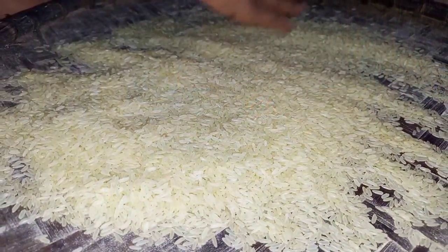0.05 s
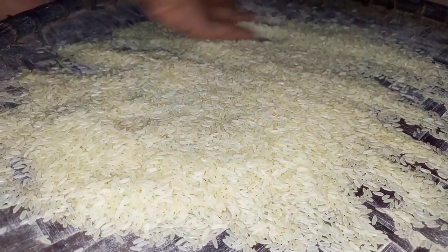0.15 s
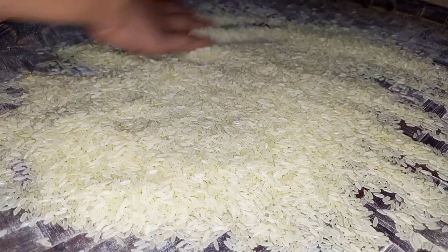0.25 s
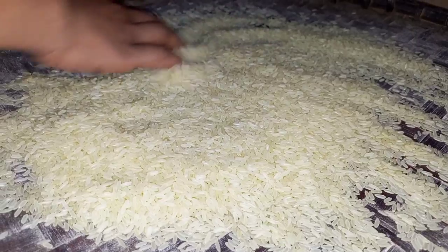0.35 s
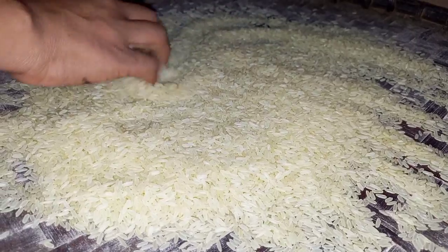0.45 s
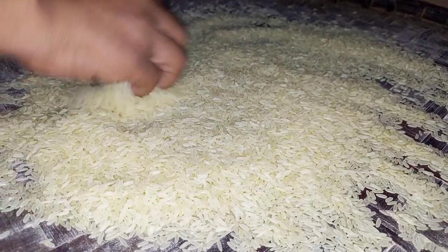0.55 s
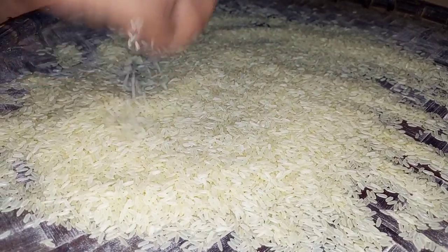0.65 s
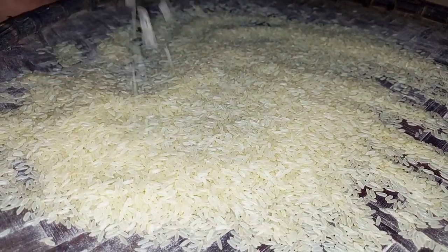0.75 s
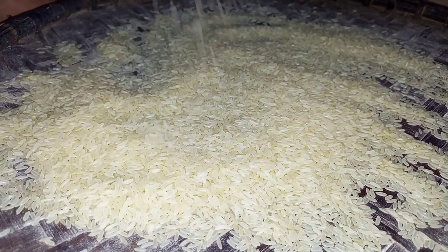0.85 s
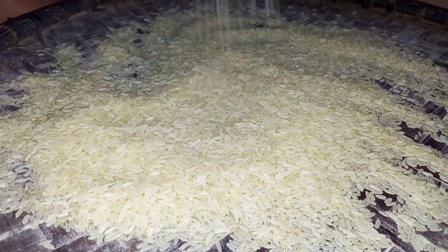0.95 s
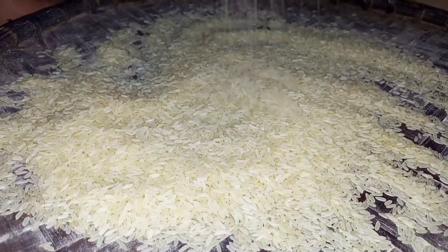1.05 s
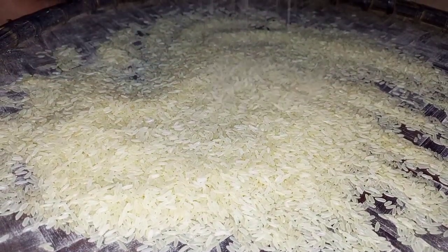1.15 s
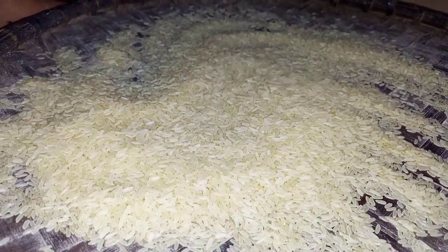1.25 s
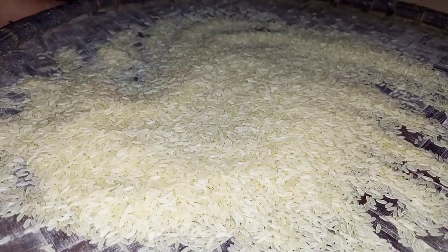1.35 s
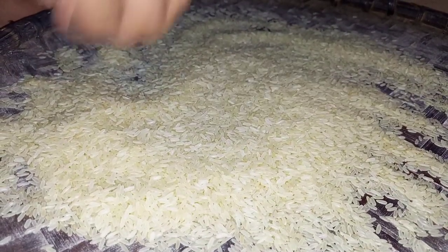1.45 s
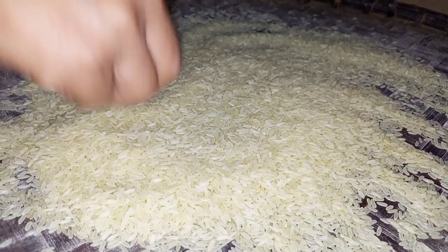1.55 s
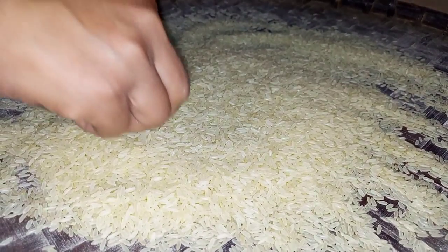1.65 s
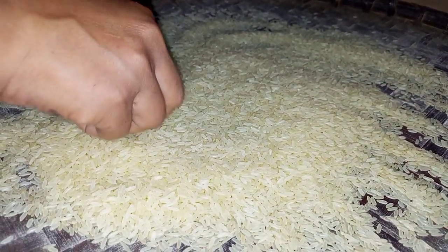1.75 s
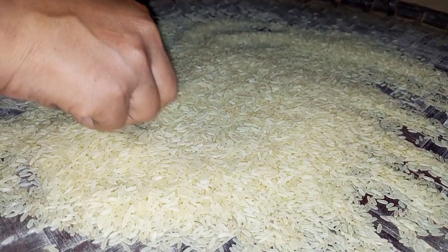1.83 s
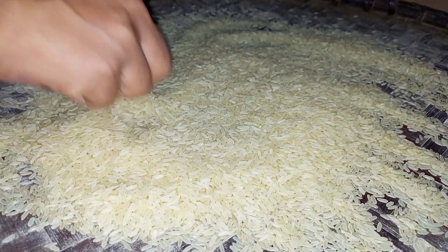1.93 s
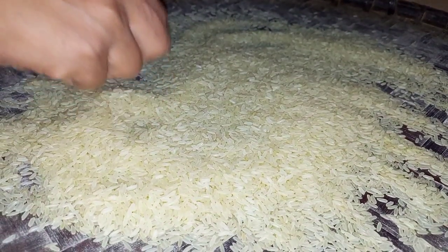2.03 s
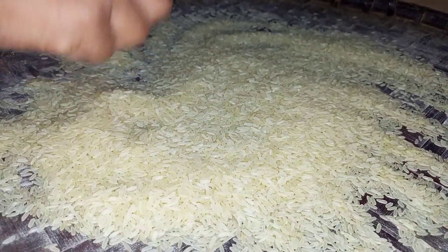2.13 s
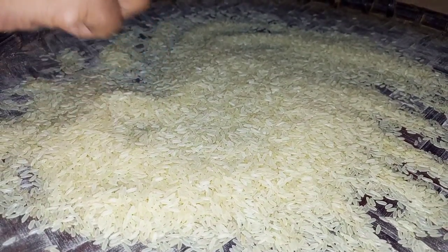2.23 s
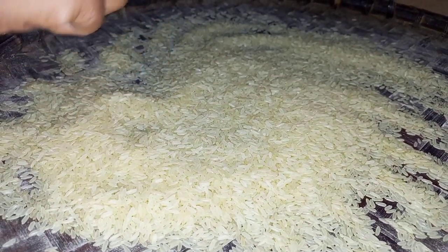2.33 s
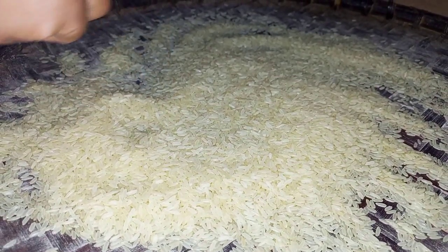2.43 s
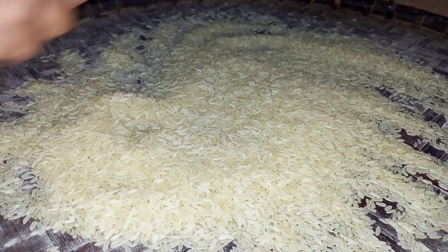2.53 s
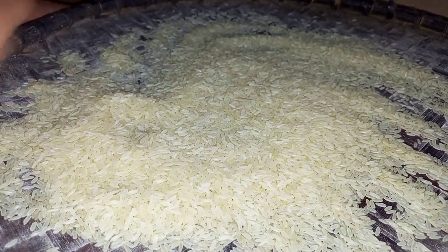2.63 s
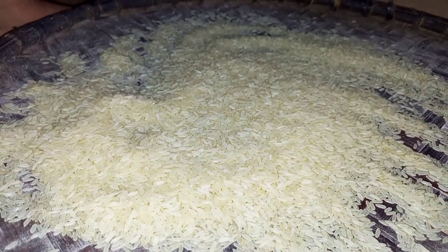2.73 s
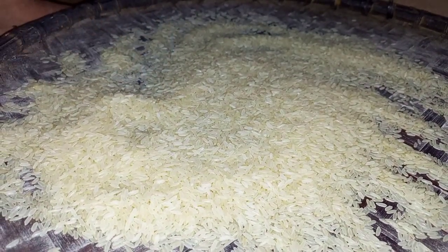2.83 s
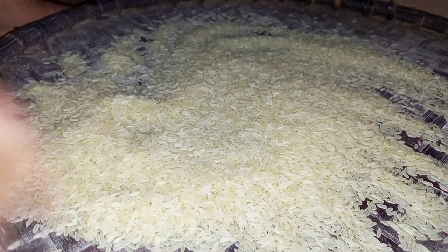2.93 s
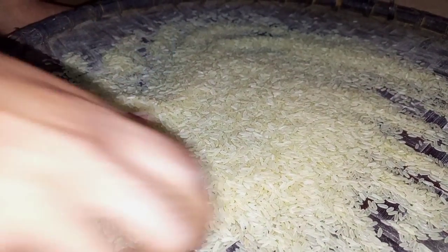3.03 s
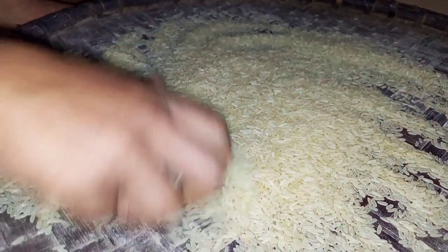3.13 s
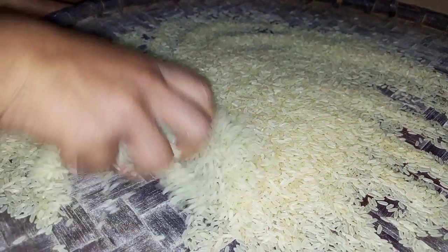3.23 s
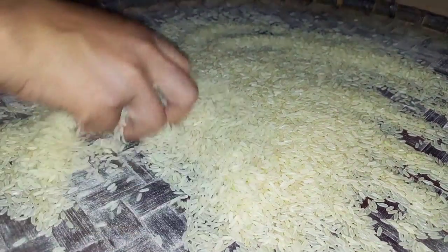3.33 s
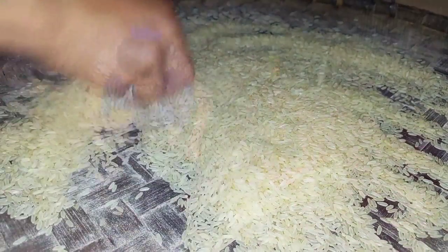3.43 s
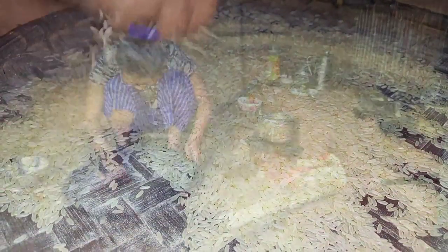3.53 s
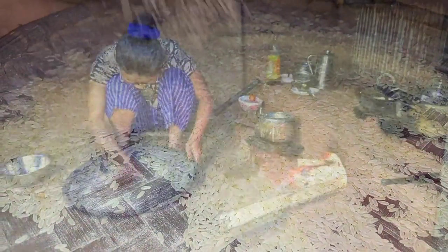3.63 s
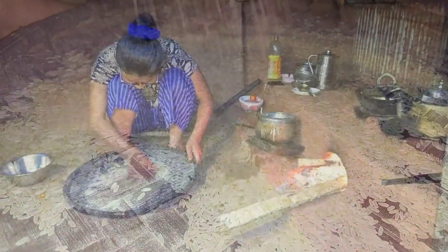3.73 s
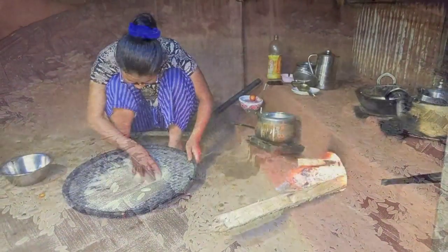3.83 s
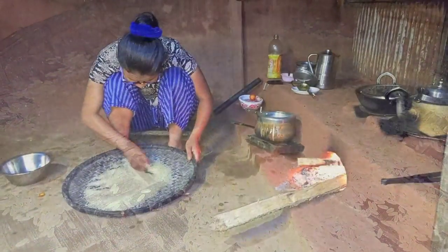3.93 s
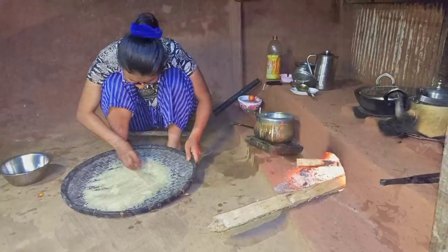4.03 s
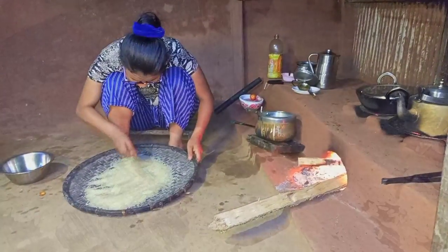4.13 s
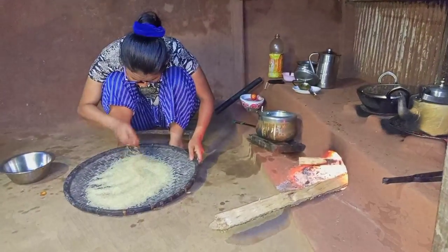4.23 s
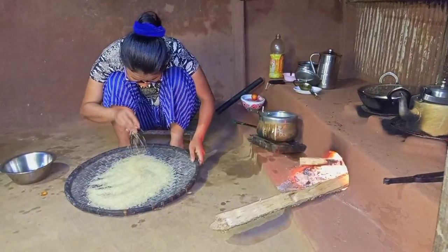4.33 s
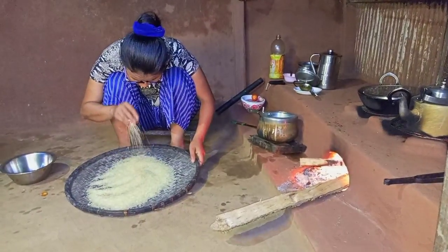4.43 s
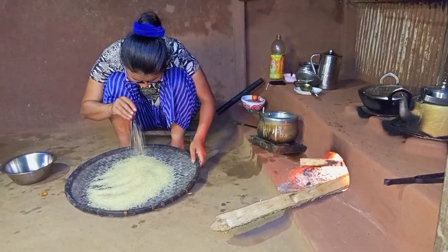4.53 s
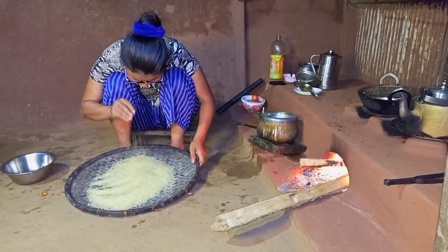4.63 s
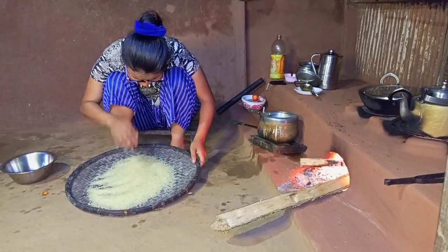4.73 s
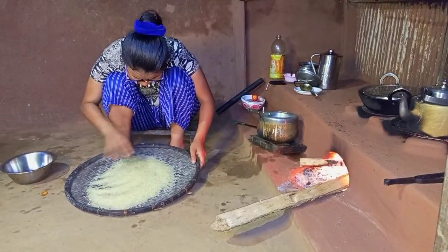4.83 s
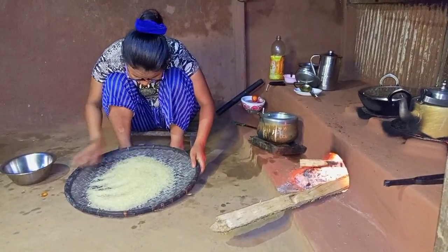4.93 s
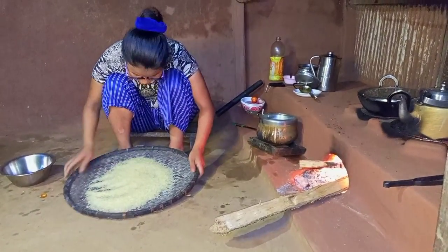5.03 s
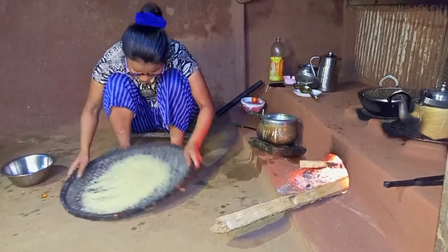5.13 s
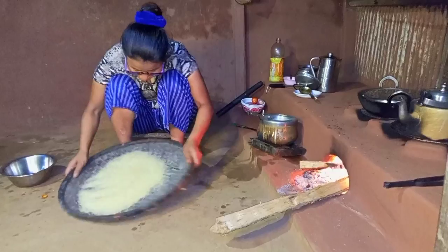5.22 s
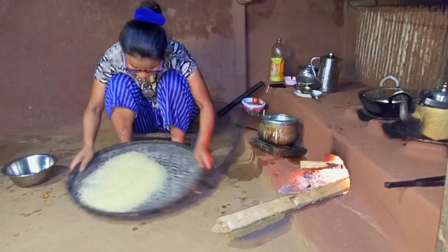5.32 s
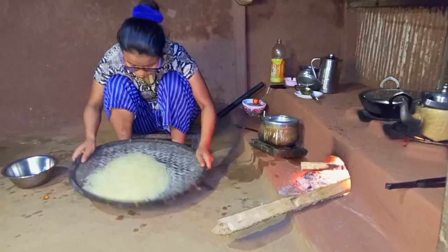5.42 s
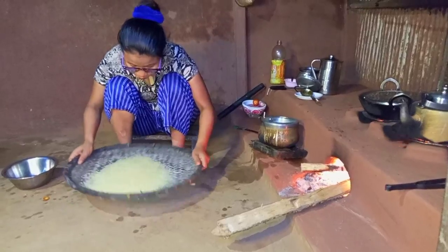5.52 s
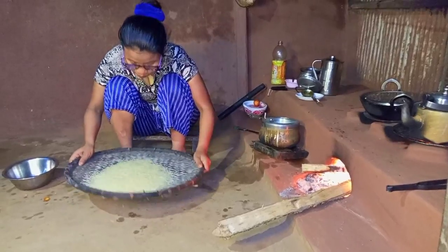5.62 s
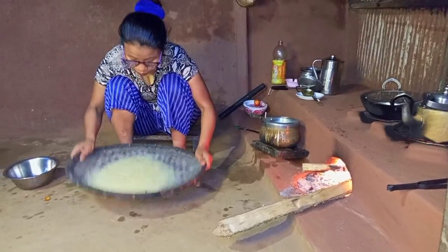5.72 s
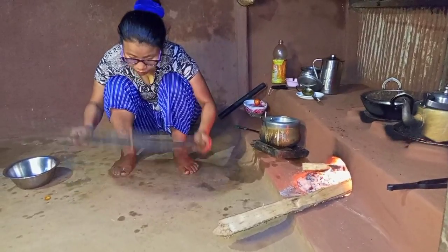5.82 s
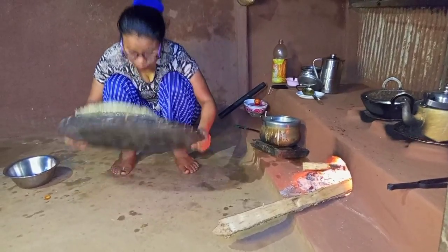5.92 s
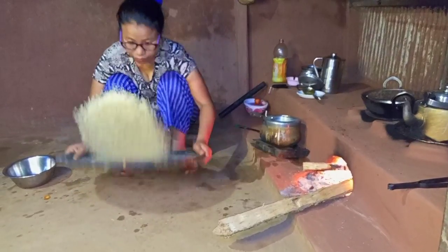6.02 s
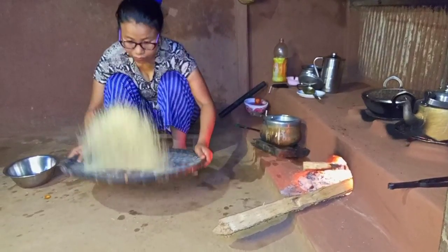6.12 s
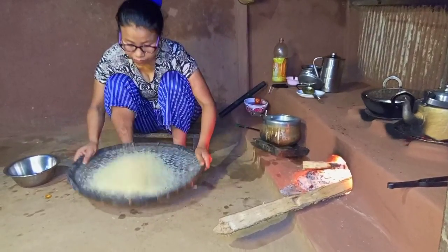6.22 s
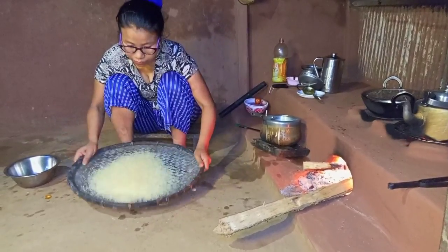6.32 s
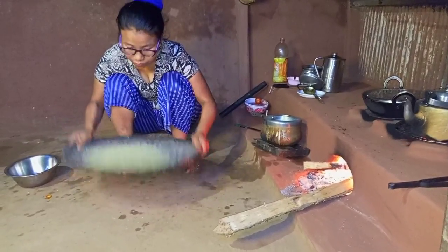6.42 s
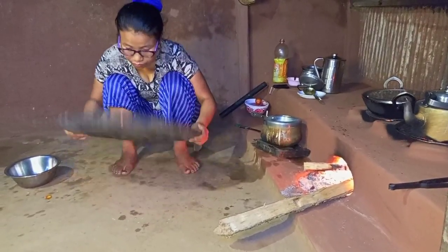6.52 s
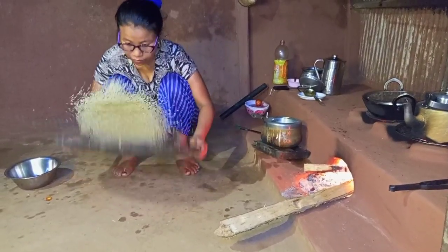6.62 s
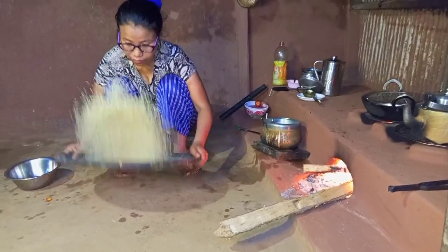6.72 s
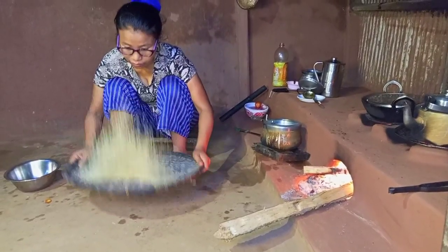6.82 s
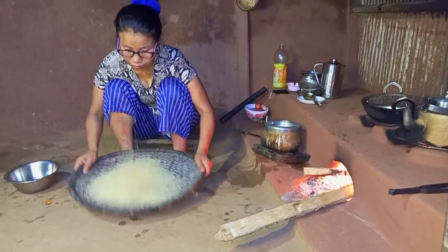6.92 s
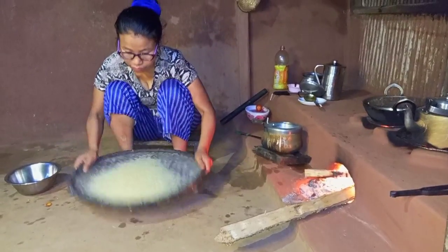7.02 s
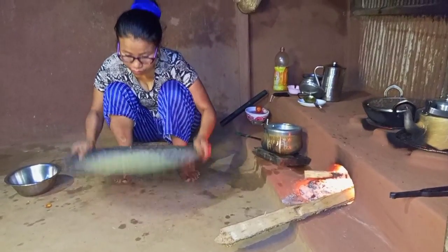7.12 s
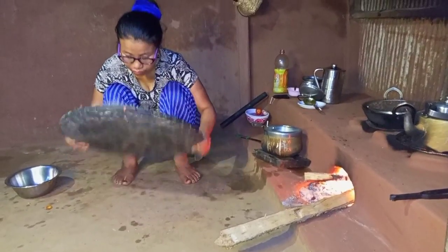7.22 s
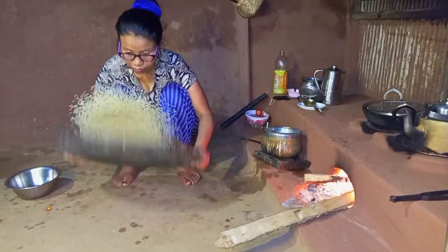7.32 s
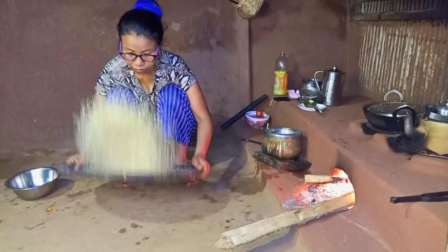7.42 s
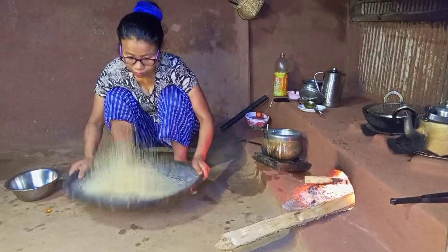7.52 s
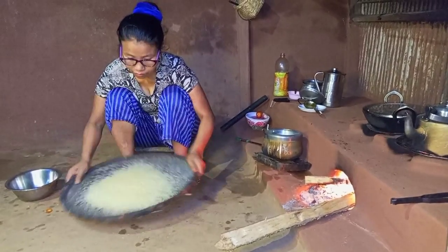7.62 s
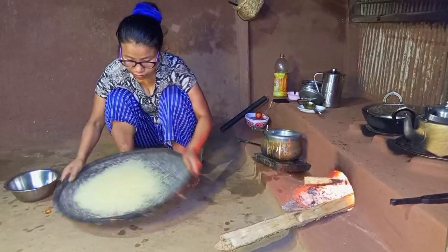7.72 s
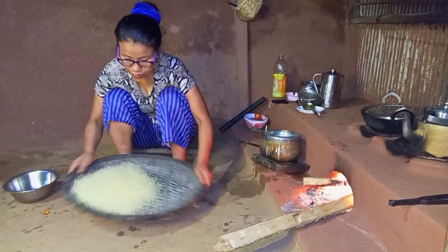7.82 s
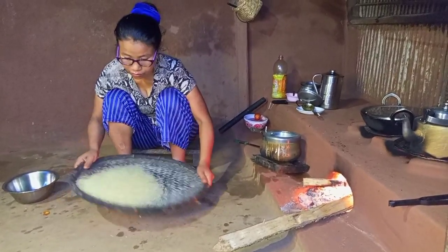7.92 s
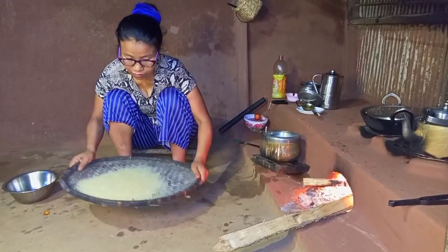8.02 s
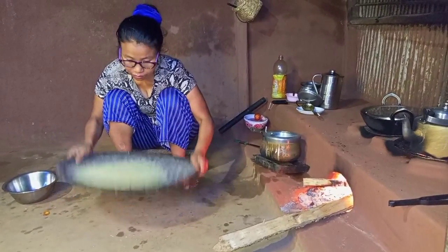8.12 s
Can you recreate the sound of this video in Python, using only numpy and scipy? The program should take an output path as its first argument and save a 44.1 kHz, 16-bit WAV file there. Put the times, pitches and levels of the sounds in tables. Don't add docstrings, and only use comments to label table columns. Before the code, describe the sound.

A quiet, dry kitchen with a soft low murmur of fire and air throughout. Close up, a hand scoops raw rice on a woven bamboo tray at about 0.2-0.8 s, a grainy bright rustle; grains drop back as scattered ticks and patter at 1.0-1.45 s. A very light brush comes near 1.9 s, then near quiet with one lone grain ticking at 2.55 s. A stronger, crunchy scoop runs 3.2-3.6 s, and the perspective fades to farther away by 3.9 s. Stirring rustles until 4.3 s, a small handful pours at 4.55-4.85 s. The tray rocks at 5.2 s and the heap slides until 5.7 s. Three tosses follow, landing near 6.05, 6.7 and 7.4 s, each a dense, sharp-edged swish of about a third of a second that settles quickly, with faint glass bangle clinks at the throws. A last rocking slide begins at 7.8 s and runs to the end.

```python
import sys
import numpy as np
from scipy import signal
from scipy.fft import rfft, irfft
from scipy.io import wavfile
from scipy.ndimage import uniform_filter1d

SR = 44100
rng = np.random.default_rng(int(sys.argv[2]) if len(sys.argv) > 2 else 0)


def to_wav(sig):
    pcm = np.clip(np.atleast_2d(sig), -1, 1) * 32767
    pcm = np.round(pcm).astype(np.int16)
    wavfile.write(sys.argv[1], SR, pcm.T)


def elevation(decibels):
    levels = np.asarray(decibels, float)
    return 10 ** (levels / 20)


N = 359856

CUT_S = 3.46, 3.86
# centre_hz, width_hz, lift_db
MIC_PEAK = [(14760, 2100, 6.5), (13900, 510, -3)]
TOSS_SPREAD_DB = 0.93


def evened(x):
    return x / np.sqrt(np.mean(x ** 2) + 1e-20)


def peaked(x, db):
    return x * elevation(db) / abs(x).max()


def add(mix, s, sound):
    part = mix[max(round(s * SR), 0):][:len(sound)]
    part += sound[:len(part)]


def smoothed(x, size):
    return uniform_filter1d(uniform_filter1d(x, int(size)), int(size))


def wander(smooth):
    return evened(smoothed(rng.standard_normal(N), smooth))


def flutter(size, smooth):
    return evened(smoothed(rng.standard_normal(size + 2000), smooth)[1000:-1000])


def read(points, hz):
    f, value = np.transpose(points)
    return np.interp(np.log(hz + 1), np.log(f + 1), value)


def humps(modes, hz):
    return sum(db / (1 + (2 * (hz - centre_hz) / width) ** 2) for centre_hz, width, db in modes)


def coloured(x, spectrum, modes=()):
    # centre_hz, width_hz, lift_db
    tray_modes = [(584, 77, 7.5), (690, 6.4, 7.5), (773.4, 6, 13.5), (870, 39, 4.5), (1050, 5.5, 9.5),
                  (1250, 9, 7), (2410, 40, 0)]
    hz = abs(np.fft.fftfreq(8192, 1 / SR))
    level_db = read(spectrum, hz) + humps([*tray_modes, *MIC_PEAK, *modes], hz)
    log_gain = np.log(elevation(np.maximum(level_db, -100)))
    minimum_phase = np.exp(np.conj(signal.hilbert(log_gain)))
    ringing = np.fft.ifft(minimum_phase).real[:4096]
    return signal.oaconvolve(x, ringing)[:len(x)]


def far_share():
    return np.interp(np.arange(N) / SR, CUT_S, [0, 1])


def air(patchy_db=2.6, stir_db=2.5, drift_share=.003, gust_db=4):
    # pitch_hz, level_db (per Hz)
    near_air = [(24, -53), (40, -20), (178, -6), (253, -12.5), (416, -12), (533, -17.5), (1070, -19.5),
                (1180, -20.5), (1760, -18), (2440, -13), (2830, -16), (5280, -13.5), (8260, -29.5),
                (13300, -32.5), (15400, -29)]
    far_air = [(24, -64), (40, -36), (87, -3.5), (136, -8), (246, -1.5), (459, -13.5), (635, -10),
               (1150, -22), (1240, -23), (1600, -31), (2440, -4.5), (3820, -12.5), (6130, -13.5),
               (15400, -23.5)]
    # centre_hz, width_hz, lift_db
    air_modes = [(160, 23, 6.5), (415, 37, 14), (1222, 93, 14.5), (2440, 120, 11.5), (5230, 870, 9),
                 (6080, 350, 10.5), (7500, 210, 9.5), (9170, 2200, 11.5), (12700, 2100, -1)]
    level_db = -66.5
    frames, hz = N // 256 + 5, np.fft.rfftfreq(1024, 1 / SR)
    column_hz = hz[:, None]
    out = np.zeros(N)
    for colour, share in (near_air, 1 - far_share()), (far_air, far_share()):
        a, b, patches = rng.standard_normal((frames, 513, 3)).T
        patches = evened(uniform_filter1d(uniform_filter1d(patches, 5, 0), 10, 1))
        drift = 1 + drift_share * evened(smoothed(b[0], 9))
        tone_db = (read(colour, hz) + humps(MIC_PEAK, hz))[:, None] + humps(air_modes, column_hz * drift)
        z = (a + 1j * b) * elevation(tone_db + patchy_db * patches / (1 + column_hz / 9000))
        gusts = evened(uniform_filter1d(b[-1], 22))
        z *= elevation(gust_db * gusts / (1 + (column_hz / 110) ** 4))
        stirs = evened(uniform_filter1d(a[0], 7))
        z *= elevation(stir_db * stirs * (column_hz / 15000) ** 2)
        murmur = evened(signal.istft(z, nperseg=1024, noverlap=768)[1][:N])
        out += np.sqrt(share) * elevation(level_db) * murmur
    return out


def walls(x, t60=0.13):
    t = np.arange(6000) / SR
    tail = rng.standard_normal(6000) * elevation(-60 * t / t60) * (t > .003)
    return signal.oaconvolve(x, tail / np.linalg.norm(tail))[:N]


def bangles():
    # start_s, pitch_hz, level_db, t60_s
    rings = [
        (0, 9000, -71, 0.98),
        (4.88, 8700, -72, 0.75),
        (6.0, 4070, -56, 0.22),
        (6.005, 10800, -58, 0.19),
        (5.69, 8650, -66, 0.54),
        (6.5, 8650, -74, .6),
        (6.64, 8650, -62, .2),
        (6.64, 9240, -64, .1),
        (6.64, 6830, -64, 0.1),
        (7.306, 3240, -64, 0.08),
    ]
    out, t = np.zeros(N), np.arange(SR // 2) / SR
    for s, hz, db, t60 in rings:
        beat = 1 + 0.27 * np.cos(2 * np.pi * 22 * t) + 0.37 * flutter(len(t), 200)
        attack = np.minimum(t / 0.0014, 1)
        add(out, s, elevation(db - 60 * t / t60) * beat * np.sin(2 * np.pi * hz * t) * attack)
    return out


def tray_hums(rough_db=3.5, waver=.05):
    # start_s, length_s, pitch_hz, level_db
    hums = [(0.39, 0.057, 328, -74), (0.415, 0.096, 412, -54), (1.55, 0.051, 500, -68),
            (2.356, 0.09, 405, -68.5), (3.296, 0.015, 554, -40), (3.878, 0.016, 1260, -46),
            (3.906, 0.013, 920, -50), (5.829, 0.051, 1250, -71), (5.929, 0.047, 1270, -74),
            (1.417, 0.067, 423, -66), (1.67, 0.048, 164, -63), (4.237, 0.13, 618, -62.5),
            (4.44, 0.19, 200, -67), (4.727, 0.091, 195, -69), (4.871, 0.091, 240.6, -70),
            (5.066, 0.14, 155.4, -62), (5.2, 0.067, 164, -59), (5.21, 0.088, 610, -66.5),
            (5.553, 0.11, 160, -64.5), (5.71, 0.12, 160, -65.5), (6.55, 0.11, 155, -69.5)]
    out = np.zeros(N)
    for s, length, hz, db in hums:
        t = np.arange(0, length, 1 / SR)
        uneven, drift = flutter(9000, 520)[:len(t)], flutter(9000, 600)[:len(t)]
        turns = np.cumsum(hz + waver * min(hz, 400) * drift) / SR
        swell = signal.windows.tukey(len(t), .6)
        add(out, s, elevation(db - 3.0 + rough_db * uneven) * np.sin(2 * np.pi * turns) * swell)
    return out


def lone_grain():
    # pitch_hz, level_db, t60_s
    bare_modes = [(1250, -15, 0.033), (1640, -3.5, 0.034), (1810, 2.5, 0.027), (2083, -5, .03),
                  (2400, -6, .04), (2760, -10, .05), (3155, -18, .04), (5420, -8, .025), (5870, -10, 0.022),
                  (8000, -26, .02), (9500, -18, .02), (4300, -22, .012)]
    start_s, level_db, rise_s = 2.5535, -39, 0.0016
    wall_echo_s, wall_echo_db = 0.019, -20
    out, t = np.zeros(N), np.arange(3000) / SR
    ring = sum(elevation(level_db + db - 60 * t / t60) * np.sin(2 * np.pi * hz * t) for hz, db, t60 in bare_modes)
    ring = ring * np.minimum(t / rise_s, 1)
    add(out, start_s, ring)
    add(out, start_s + wall_echo_s, elevation(wall_echo_db) * ring)
    return out


def clusters(rise_s=0.0021, end_db=-14, grit_db=3, width_share=.042):
    # start_s, length_s, pitch_hz, level_db
    strips = [(1.014, 0.02, 9700, -56.5), (1.015, .02, 11600, -64), (1.103, .02, 11400, -63),
              (1.103, 0.028, 9300, -66), (1.138, .015, 10200, -54), (1.163, .05, 8600, -64),
              (1.196, 0.037, 8800, -63), (1.245, 0.044, 8800, -68), (1.3, .03, 9300, -53),
              (1.4, 0.029, 9600, -63), (3.53, 0.012, 9500, -55), (3.545, .006, 9500, -50),
              (3.558, .006, 9700, -51), (4.468, .005, 9500, -60), (4.59, .006, 9500, -56),
              (5.79, .004, 9500, -64), (5.79, .004, 4800, -64), (3.632, 0.0065, 9500, -43),
              (3.672, 0.011, 9300, -46), (3.908, .008, 9600, -44), (4.558, .012, 10500, -50.5),
              (4.645, 0.026, 8500, -63), (4.68, .04, 9900, -55), (4.743, 0.075, 10600, -52),
              (4.768, .045, 8800, -51), (4.86, .015, 10000, -61), (5.977, 0.14, 5830, -58.5),
              (5.978, 0.058, 7300, -59), (5.983, .02, 9200, -63), (5.993, 0.044, 3850, -63),
              (7.303, .01, 6600, -54), (7.304, 0.025, 3300, -57), (7.301, 0.038, 2650, -66.5),
              (7.312, 0.062, 6560, -63), (7.324, .02, 9350, -59), (7.33, .012, 7500, -55),
              (0, .025, 5100, -62), (.204, 0.013, 5700, -54), (.905, 0.086, 1800, -66),
                  (.93, .04, 2460, -73), (.96, 0.043, 5240, -66), (1.46, 0.084, 3170, -67.5),
                  (.8, 0.046, 9500, -69.5), (.98, .03, 1750, -59), (1.836, .045, 2450, -68),
                  (1.84, 0.044, 1790, -67), (1.882, 0.025, 2120, -65), (1.892, .015, 1760, -62),
                  (1.915, 0.061, 1820, -69), (1.945, .015, 2120, -66), (2.597, .012, 1740, -71),
                  (2.67, .05, 4330, -69.5), (4.2, 0.063, 5900, -68), (4.26, 0.034, 6000, -67),
                  (4.31, 0.072, 1590, -73), (4.325, 0.049, 3380, -71), (4.425, 0.084, 2490, -65),
                  (4.434, .07, 6400, -66), (4.48, .04, 2070, -62), (4.516, 0.013, 6300, -57),
                  (4.534, 0.017, 6130, -50), (4.84, 0.043, 6060, -60), (4.85, 0.047, 2280, -62),
                  (5.21, 0.068, 4070, -59), (5.212, 0.035, 6660, -65), (5.22, 0.048, 2900, -58.5),
                  (5.225, 0.044, 698, -67), (5.312, .025, 6560, -62), (5.315, 0.03, 2700, -49.5),
                  (6.638, 0.037, 6800, -60), (6.638, .018, 8700, -62), (6.638, 0.024, 9350, -59),
                  (6.64, .03, 5500, -65), (6.704, .02, 2560, -58), (6.73, 0.12, 582, -67)]
    out, t = np.zeros(N), np.arange(4000) / SR
    for s, length, hz, db in strips:
        smooth = max(SR / (hz * width_share * 3), 2)
        rattle = flutter(4000, smooth) * np.cos(2 * np.pi * hz * t)
        rattle += flutter(4000, smooth) * np.sin(2 * np.pi * hz * t)
        grit = elevation(grit_db * flutter(4000, 40))
        fade = elevation(db + end_db * (t / length) ** 3)
        add(out, s, rattle * grit * np.minimum(t / rise_s, 1) * fade)
    return out


def ticks(far_db=-10, own_db=-6, scatter_db=-10, echo_s=0.019, echo_db=-16, crack=.3):
    # start_s, level_db, main_hz, sparkle_db (spray over the modes)
    near_ticks = [(0.216, -46, 1560, 2), (0.975, -48, 1720, -6), (0.995, -46, 1890, -15),
                  (1.1698, -42, 2010, 3), (1.231, -40, 1900, -8), (1.456, -52, 2400, -1),
                  (1.017, -35, 2080, -10), (1.0882, -36, 2080, -15), (1.102, -36, 1670, -18),
                  (1.138, -37, 1630, -5), (1.2102, -32, 2450, -9), (1.251, -33, 2160, -15),
                  (1.302, -28, 2070, -3), (1.339, -33.5, 1810, -9), (1.3703, -42, 1570, 3),
                  (1.402, -37.5, 1700, -6), (1.882, -52, 2100, -8), (2.899, -62, 2430, 6),
                  (3.237, -40, 1350, -16), (3.633, -29, 2030, -6.5), (3.671, -35, 1790, -6.5),
                  (3.526, -42, 1900, 0), (3.541, -39, 1800, -2), (3.7342, -33, 1520, -12),
                  (3.744, -35.5, 2050, -13), (3.78, -37, 2200, -10), (3.8174, -42, 1250, -19)]
    far_ticks = [(3.91, -38, 1700, -14), (3.921, -42, 2100, -12), (4.094, -40, 2300, 1),
                 (4.468, -52, 2460, 5.5), (4.518, -56, 2460, 10), (4.535, -52, 2400, 9),
                 (4.5594, -46, 2300, 2), (4.589, -45, 2400, 4), (4.9573, -54.5, 2480, -3),
                 (5.224, -49, 2920, -6), (5.789, -65, 2900, 13.5), (5.819, -54, 2890, 6),
                 (7.305, -55, 3300, 7), (4.6484, -55, 2450, 3), (4.6548, -52, 2450, 3),
                 (4.6817, -44, 2400, 10), (4.745, -38, 2400, 6), (4.775, -41, 2400, 10)]
    # pitch_hz, level_db, t60_s
    weave_modes = [(1350, -27, 0.012), (1810, -5, 0.011), (1980, -19, 0.025), (2400, -27, 0.021),
                   (2824, -18.5, 0.021), (3220, -32, 0.01)]
    # pitch_hz, level_db (per Hz)
    near_sparkle = [(3500, -40), (4800, -12), (5800, 0), (7000, -22), (9500, -19), (11800, -28),
                    (13500, -38), (15000, -33), (16500, -50)]
    far_sparkle = [(3500, -30), (5200, -16), (6200, 0), (7200, -16), (9500, -20), (11000, -19),
                   (13500, -30), (15000, -26), (16500, -50)]
    out, t = np.zeros(N), np.arange(2000) / SR
    events = [*near_ticks, *far_ticks]
    hiss, knocks = rng.standard_normal((2, len(events), len(t)))
    near, far = np.split(hiss, [len(near_ticks)])
    sprays = np.r_[coloured(near.ravel(), near_sparkle), coloured(far.ravel(), far_sparkle)]
    sprays = sprays.reshape(-1, len(t))
    for (s, db, main_hz, sparkle_db), noise, knock, spray in zip(events, hiss, knocks, sprays):
        distance_db = far_db * (s > CUT_S[1])
        modes = [(hz, level + distance_db, t60) for hz, level, t60 in weave_modes]
        ring = np.zeros(len(t))
        for hz, level, t60 in [*modes, (main_hz, own_db, .012)]:
            louder, higher = rng.standard_normal(2)
            tone = np.sin(2 * np.pi * hz * (1 + 0.048 * higher) * t)
            ring += elevation(level + 0.5 * louder - 60 * t / t60) * tone
        ring *= np.minimum(t / 0.00046, 1)
        blows = elevation(scatter_db - 60 * t / .035) * knock * (abs(noise) > 2.1)
        blows[20] = 1
        spray = spray * elevation(-60 * t / 0.037) * np.minimum(t / 0.0013, 1)
        spray = spray + crack * knock * abs(spray).max() * elevation(-60 * t / .004)
        tick = peaked(signal.oaconvolve(ring, blows)[:2000], db) + peaked(spray, db + sparkle_db)
        add(out, s, tick)
        add(out, s + echo_s, elevation(echo_db) * tick)
    return signal.sosfilt(signal.butter(4, 950, "high", fs=SR, output="sos"), out)


def slide(row, start_s, start_db, settle_db, body_db, weave_db):
    swell, thin = (0.17, -0.016, -0.21, 0.33), (0.21, 0.31, -0.54, 0.024)
    settle_at = np.array([.62, 1, 1.5, 2.2])
    lands, ends, db, fizz_db, settle_s = row
    s = [*np.add(lands, start_s), ends, *(ends + settle_s * settle_at)]
    flow = np.column_stack([s, np.add(db, [*start_db, 0, *settle_db])])
    return "toss", flow, (body_db, weave_db, fizz_db, TOSS_SPREAD_DB), swell, thin


def hand_movements():
    # time_s, rattle_db
    first_scoop = [(0.199, -74.5), (0.221, -43.5), (.318, -40), (.43, -37), (.5, -38.5), (.62, -36.5),
                   (.7, -41), (.77, -55), (.9, -80)]
    first_drop = [(.9, -68), (.99, -74), (1.02, -55), (1.08, -56), (1.14, -53), (1.25, -50), (1.315, -45),
                  (1.41, -56.5), (1.55, -83)]
    brush = [(1.78, -99), (1.85, -79), (1.89, -70.5), (1.91, -76), (2.0, -84)]
    second_scoop = [(3.22, -113), (3.241, -49.5), (3.27, -36), (3.32, -34), (3.396, -35), (3.47, -38.5),
                    (3.56, -53), (3.68, -59), (3.86, -71)]
    stirring = [(3.5, -48), (3.7, -58), (3.938, -46.5), (4.074, -46.5), (4.158, -55.5), (4.212, -59.5),
                (4.284, -57), (4.412, -74.5), (4.44, -90)]
    second_drop = [(4.41, -93), (4.436, -72), (4.52, -65), (4.56, -55), (4.64, -51), (4.688, -41.5),
                   (4.795, -41), (4.832, -50), (4.95, -89)]
    # body_db, weave_db, fizz_db (above the rattle), size_spread_db
    hand_mix = [
        (-13, 0.5, -1.5, 2.3),
        (-9.5, 2.5, -5, 2.5),
        (-6, 7, 8, 1.9),
        (-8, 1.5, 2.5, 2.7),
        (-14.5, -2, -1, 2.5),
        (-14.5, -1, -0.5, 3.9),
    ]
    scoop = (-0.5, -0.4, 0.1, -0.14), (-0.069, 0.3, -0.01, 0.036)
    drop = (0.029, 0.12, 0.078, 0.054), (-0.29, 0.027, -.1, -0.039)
    pour = (-0.0052, 0.1, -0.058, -0.038), (-0.079, 0.19, -0.11, -0.032)
    hands = [("scoop", first_scoop, scoop), ("trickle", first_drop, drop), ("trickle", brush, drop),
             ("scoop", second_scoop, scoop), ("stir", stirring, drop), ("pour", second_drop, pour)]
    return [(colour, flow, mix, *change) for (colour, flow, change), mix in zip(hands, hand_mix)]


def tray_movements():
    # lands_s, slide_ends_s, rattle_db, fizz_db (above the rattle), settling_s
    tosses = [
        (6.055, 6.359, -31, 3.5, 0.19),
        (6.708, 7.057, -30.5, 3, .15),
        (7.397, 7.718, -30.5, 3, 0.19),
    ]
    rocks = [
        (5.298, 5.592, -31, -0.5, 0.15),
        (7.794, 8.2, -30.5, -1, .14),
    ]
    # start_s, rattle_db, weave_db, fizz_db (above the rattle), slowness (times)
    jerks = [
        (0.004, -67, 9, 5, 0.64),
        (5.232, -49, 2, -10, 2.6),
        (5.996, -53, -5, -2, 1.9),
        (6.642, -57, -16, 4, 1.5),
        (7.332, -53.5, -30, 7.5, 1.4),
    ]
    land_s, land_db = (0.0023, .02, 0.028, 0.073), (-24, -11, -3.5, -1.5)
    settle_db = (-10.5, -39.5, -47.5, -50)
    tilt_s, tilt_db = (.001, .02, 0.045, 0.068), (-48, -23.5, -4, 0)
    tilt_back_db = (-19.5, -38.5, -47, -47)
    jerk_s = np.array([-0.11, -0.018, -0.0023, -0.0067, 0.026, 0.1])
    jerk_db, jerk_body_db = (-25.5, -23.5, -7, -5, -16, -25), -23
    jerk_change = (0.46, -0.035, -0.068, -0.1)
    out = [slide(row, land_s, land_db, settle_db, body_db=-19, weave_db=-5.5) for row in tosses]
    out += [slide(row, tilt_s, tilt_db, tilt_back_db, body_db=-16, weave_db=-4) for row in rocks]
    for s, db, weave_db, fizz_db, slow in jerks:
        flow = np.column_stack([s + slow * jerk_s, np.add(db, jerk_db)])
        mix = jerk_body_db, weave_db, fizz_db, TOSS_SPREAD_DB
        out.append(("toss", flow, mix, jerk_change, jerk_change))
    return out


def flows(names, quiet_db=-120, most_below_db=30):
    lag_ms = 20, 10, 0.5, 0.5
    t = np.arange(0, N / SR, .001)
    power, spread, total = np.zeros((len(names), 4, len(t))), 0, 1e-30
    for colour, flow, mix, swell, thin in hand_movements() + tray_movements():
        s, db = np.transpose(flow)
        rattle = np.interp(t, s, db, quiet_db, quiet_db)
        below = np.minimum(db.max() - rattle, most_below_db)
        mix, swell, thin = np.reshape([mix, swell, thin], (3, 4, 1))
        body, weave, fizz, sizes = mix + below * np.where(t < s[db.argmax()], swell, thin)
        power[names.index(colour)] += elevation(rattle + np.array([body, weave, 0 * t, fizz])) ** 2
        spread = spread + sizes * elevation(rattle) ** 2
        total = total + elevation(rattle) ** 2
    tossed = power[names.index("toss")]
    for k, lag in enumerate(lag_ms):
        keep = np.exp(-1 / lag)
        lagging = signal.lfilter([1 - keep], [1, -keep], tossed[k] ** .25) ** 4
        tossed[k] = np.minimum(tossed[k], lagging)
    return t, np.sqrt(power), spread / total


def patchy(x, patch_db, broad_db):
    z = signal.stft(x, nperseg=1024, noverlap=768)[2]
    chance = rng.standard_normal((2, *z.T.shape))
    patches = evened(uniform_filter1d(uniform_filter1d(chance[0].T, 3, 0), 6, 1))
    patches = patches / (1 + np.arange(len(z))[:, None] / 200)
    broad = evened(uniform_filter1d(uniform_filter1d(chance[1].T, 18, 0), 5, 1))
    broad = broad * np.linspace(.4, 1.8, len(z))[:, None]
    broad_db = np.interp(np.arange(z.shape[1]) * 256, np.arange(N), broad_db)
    lifted = z * elevation(patch_db * patches + broad_db * broad)
    return signal.istft(lifted, nperseg=1024, noverlap=768)[1][:N]


def grain_clicks(spread, per_s=9000, clump_db=-1.04, bed=0.78):
    size = elevation(spread * np.minimum(rng.exponential(1, N), 5)) * rng.choice([-1, 1], N)
    clicks = size * (rng.random(N) < per_s / SR)
    mean_power = per_s / SR / (1 - np.minimum(spread * np.log(10) / 10, .9))
    clumps = elevation(clump_db * spread / 3 * wander(140))
    impacts = (clicks / np.sqrt(mean_power) + bed * rng.standard_normal(N)) * clumps
    return patchy(impacts, patch_db=3.2, broad_db=np.clip(.4 + .6 * (spread - 1.7), 0, 2.5))


def rice():
    # pitch_hz, level_db (per Hz)
    scoop = [(120, -41), (200, -30), (406, -30), (470, -24), (676, -20.5), (782, -6), (1500, -5),
             (1770, -1.5), (4470, -12.5), (5570, -2), (7440, -16.5), (9600, -3.5), (13600, -20),
             (15400, -8.5)]
    trickle = [(240, -51), (400, -29), (672, -31), (872, -10), (1060, -19), (1220, -4.5), (1610, 1.5),
               (2390, 5), (4680, -13), (5530, -2.5), (7860, -24), (9160, -11), (13600, -26), (15400, -14)]
    stir = [(180, -80), (300, -37), (460, -41), (640, -14.5), (983, -5.5), (1240, -6.5), (1960, -3),
            (2430, -2), (4940, -7), (6120, -3.5), (7340, -9), (10700, -7), (13500, -22), (15400, -9.5)]
    pour = [(300, -61), (600, -12), (1200, -2.5), (2000, -5), (4300, -8), (7600, -11.5), (10300, -7.5),
            (13500, -23), (15400, -9.5)]
    toss = [(120, -66), (200, -41.5), (364, -10), (479, -12.5), (553, -10.5), (990, -11.5), (2200, -2.5),
            (2500, 2.5), (5370, -8), (6320, -1.5), (8010, -9), (9430, -3.5), (13600, -15), (15400, -7.5)]
    # centre_hz, width_hz, lift_db
    trickle_modes = [(4100, 280, 2), (4650, 210, -14), (8700, 300, 3)]
    heap_modes = [(2430, 190, -0.5), (6360, 920, 4.5)]
    pour_modes = [(2450, 400, 5.5), (6210, 810, 14)]
    split_hz = 1200, 4000, 8000
    colours = {"scoop": (scoop, []), "trickle": (trickle, trickle_modes), "stir": (stir, heap_modes),
               "pour": (pour, pour_modes), "toss": (toss, [])}
    s, all_gains, spread_db = flows(list(colours))
    t = np.arange(N) / SR
    drive = grain_clicks(np.clip(np.interp(t, s, spread_db), 0, 6))
    hz, out = np.fft.rfftfreq(N, 1 / SR), np.zeros(N)
    lows = [0] + [1 / (1 + (hz / edge) ** 12) for edge in split_hz] + [1]
    for (colour, modes), gains in zip(colours.values(), all_gains):
        ringing = rfft(coloured(drive, colour, modes))
        for under, upto, gain in zip(lows, lows[1:], gains):
            out += np.interp(t, s, gain) * evened(irfft(ringing * (upto - under), N))
    return out


def scene():
    duck_db, duck_from_db = -1, -46.5
    struck, grains, kitchen = ticks() + lone_grain(), rice(), air()
    tail = elevation(-12) * walls(struck)
    grains_db = 10 * np.log10(abs(uniform_filter1d(grains ** 2, 2000)) + 1e-12)
    loud = np.clip((grains_db - duck_from_db) / 10, 0, 1)
    rumble = signal.sosfiltfilt(signal.butter(2, 220, fs=SR, output="sos"), kitchen)
    mix = grains + struck + tail + tray_hums() + bangles() + clusters() + kitchen
    mix = mix - (1 - elevation(duck_db * loud)) * rumble
    return np.array([mix, mix])


def add_ear_slips(mix):
    # start_s, low_hz, high_hz, level_db
    slips = [
        (5.41, 6860, 9000, -41),
        (6.734, 7500, 9000, -43),
        (6.734, 12300, 13900, -47),
        (7.059, 4550, 5800, -44),
        (7.059, 8100, 9700, -44),
        (7.059, 13700, 15200, -44),
    ]
    hz = np.fft.rfftfreq(2048, 1 / SR)
    for s, low_hz, high_hz, db in slips:
        band = (hz > low_hz) & (hz < high_hz)
        slip = evened(irfft(rfft(rng.standard_normal(2048)) * band))
        slip *= elevation(db) * signal.windows.tukey(2048, .8)
        add(mix[0], s, slip)
        add(mix[1], s, -slip)


def low_pass(x):
    return signal.sosfilt(signal.butter(12, 16820, fs=SR, output="sos"), x)


def record(dry):
    shaved = dry - .24 * np.tanh(dry / .24)
    out = dry - signal.sosfilt(signal.butter(2, 300, "high", fs=SR, output="sos"), shaved)
    edge = signal.firwin(1023, 15520, window=("kaiser", 5), fs=SR)
    out = signal.oaconvolve(out, edge[None], "same")
    add_ear_slips(out)
    return low_pass(out)


dry = scene()
out = record(dry)
to_wav(out)
```